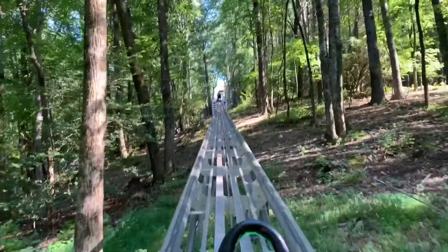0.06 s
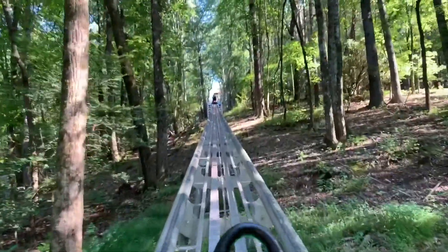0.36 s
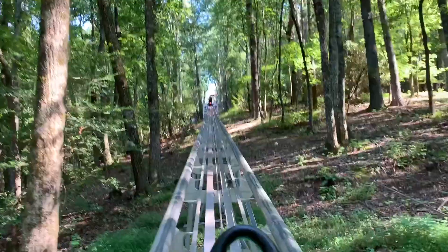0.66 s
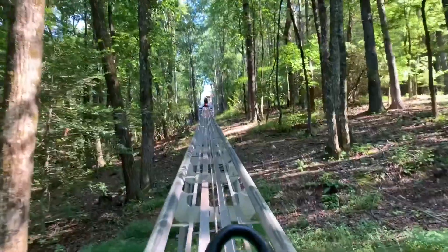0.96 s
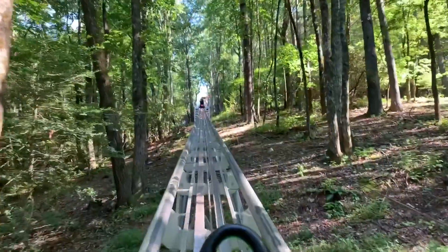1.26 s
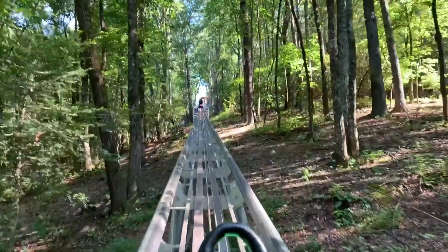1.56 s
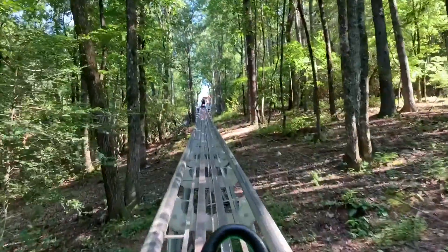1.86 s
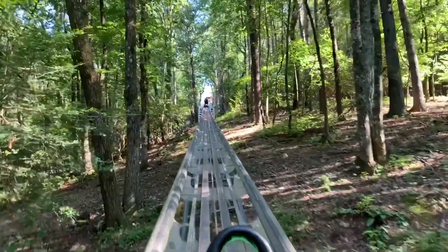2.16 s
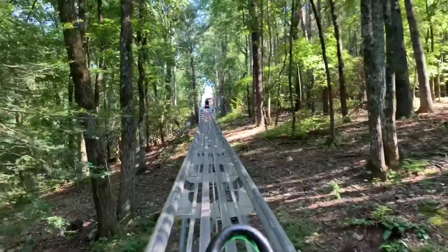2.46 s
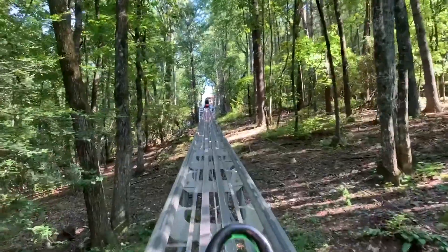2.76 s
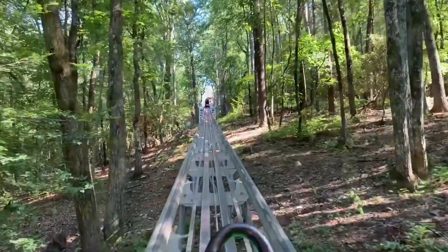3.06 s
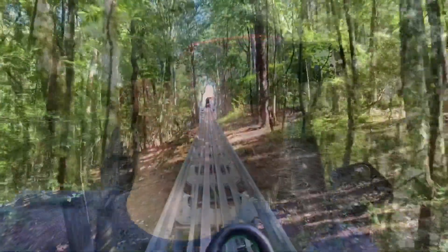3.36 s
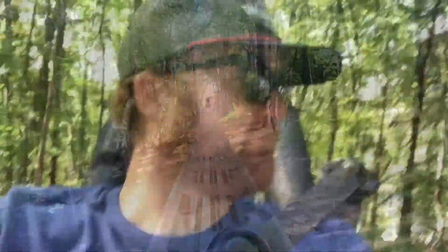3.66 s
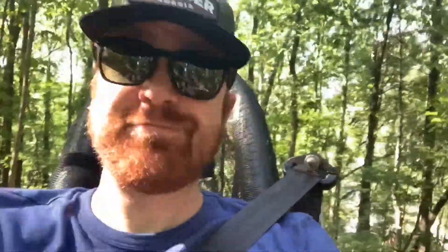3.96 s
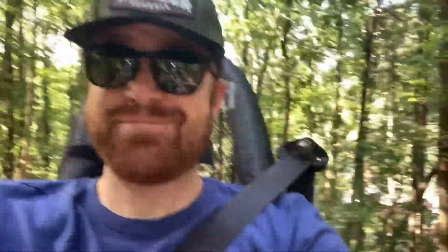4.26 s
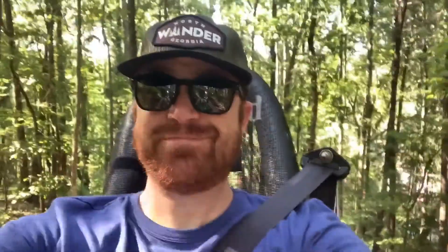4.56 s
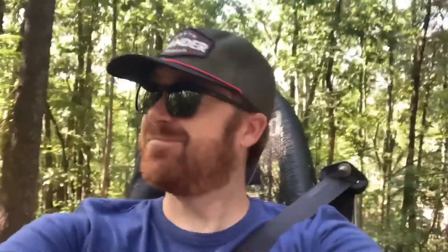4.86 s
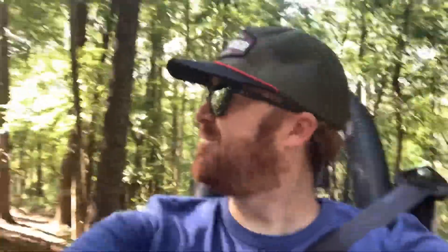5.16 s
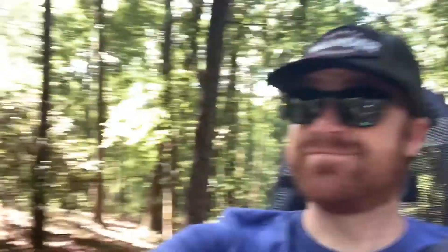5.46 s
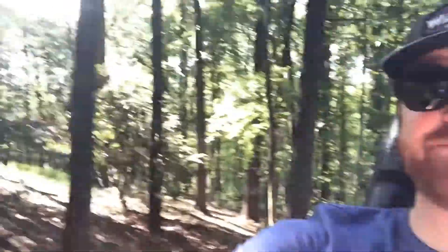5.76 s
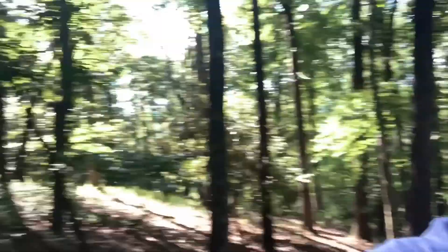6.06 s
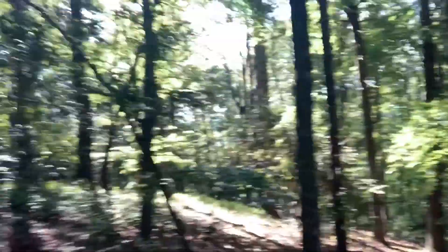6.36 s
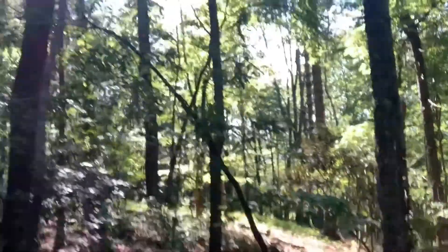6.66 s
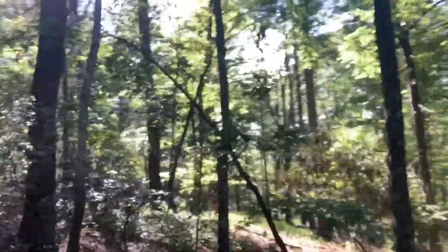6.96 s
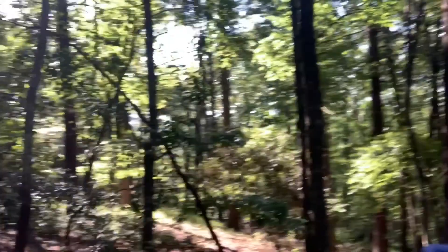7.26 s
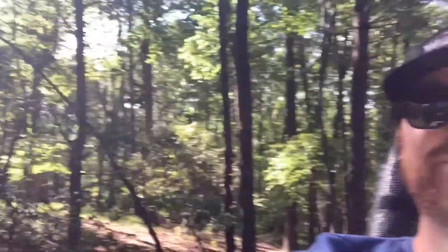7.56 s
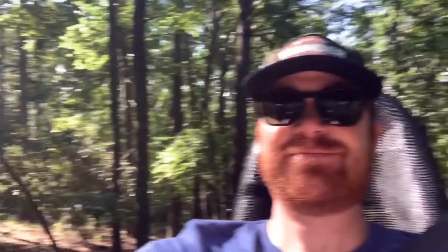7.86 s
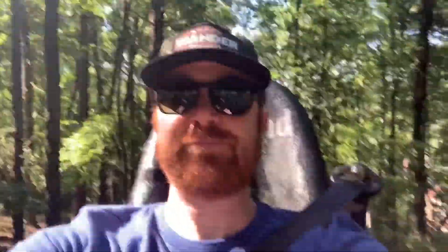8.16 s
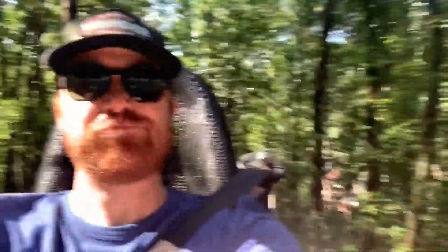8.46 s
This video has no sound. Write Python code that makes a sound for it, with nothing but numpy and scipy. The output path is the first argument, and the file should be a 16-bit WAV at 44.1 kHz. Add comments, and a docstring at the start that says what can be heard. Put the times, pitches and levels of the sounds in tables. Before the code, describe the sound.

A coaster cart rumbles along a steel track with sharp, ringing double clacks, dull bumps and gusts on the microphone.

```python
"""In the woods, on the seat of a coaster cart being hauled up a steel lift track.
The wheels rumble through the cart's frame and gusts buffet the microphone. Each axle crosses the track
joints with a double clack that rattles the cart and leaves the rails ringing. Loose fittings tick,
far blows thud along the rail, uneven spots make the seat boom, and steel squeals thinly on steel.
Later a faint high whine throbs and a thin sizzle comes in."""
import sys
import numpy as np
from scipy import signal
from scipy.fft import rfft, irfft, next_fast_len
from scipy.io import wavfile
from scipy.ndimage import map_coordinates

SR = 44100
rng = np.random.default_rng(int(sys.argv[2]) if len(sys.argv) > 2 else 0)


def digitize_waveform(pressure):
    """Quantize a signal to 16-bit integers and store it at the path in sys.argv[1].

    Rows of a 2-D input are taken as channels; values are limited to [-1, 1].
    """
    field = np.atleast_2d(pressure).T
    bounded = np.clip(field, -1, 1)
    quanta = np.round(bounded * 32767).astype(np.int16)
    wavfile.write(sys.argv[1], SR, quanta)


N = 375229
T = np.arange(N) / SR

# the tones that the rails ring with: (pitch [Hz], strength [dB])
RAIL_TONES = [(732, 4), (840, 6), (915, 3), (1044, 11), (1108, 7), (1225, 6), (1320, 5), (1429, 6),
              (1494, 4), (1575, 5), (1631, 6), (1688, 6), (1778, 8), (1908, 6), (2115, 7), (2275, 5),
              (2769, 3), (2938, 7), (3020, 6), (4080, 5), (4530, 5), (6260, 5)]
RAIL_SHARPNESS = 50  # a tone's pitch divided by its width
# One double clack a row; the wheel touches the joint, then lands: (landing time [s], touch earlier by [s],
# chatter length [s], knock [dB], frame [dB], main frame tone [Hz], second frame tone [Hz], clang [dB],
# treble [dB], zing [dB], rail ring [dB], its time to fade 60 dB [s], where steel rings most [Hz],
# clearest rail tone [Hz], frame at touch vs landing [dB], steel at touch vs landing [dB],
# left vs right [dB])
JOINT_CLACKS = [(0.0, .029, 0.038, -61, -32.5, 293, 610, -41, -51, -68, -26, 0.86, 1520, 1429, 0, 12.5, 0),
                (0.43, .021, 0.048, -21.5, -27, 285, 340, -33.5, -61, -88, -32.5, 1, 1170, 1050, -4.5, -4, 1),
                (3.131, .03, 0.041, -3, -20.5, 293, 524, -28, -46, -65, -28, 0.81, 1750, 1108, -5.5, -7, -1),
                (3.62, .023, 0.05, -47, -36.5, 295, 345, -50, -62.5, -77, -45.5, .6, 1550, 1044, -21, 6.5, -1.5),
                (4.945, 0.025, 0.048, -14, -24, 335, 198, -45, -59, -102, -39, 1.0, 1730, 1044, -2.5, 1, 1.5),
                (5.439, 0.031, 0.053, -14, -21.5, 290, 336, -34, -46.5, -64, -35.5, 0.87, 1780, 1044, -7, -3.5, 1.5),
                (6.524, .032, 0.041, -9, -17, 460, 1040, -34.5, -46.5, -71, -37.5, 0.57, 1060, 1320, -9, -18, 2.5),
                (7.011, 0.034, 0.049, -11.5, -18, 326, 325, -33, -46.5, -58.5, -36.5, 0.82, 820, 732, -8, -2, 1.5),
                (8.136, .017, 0.037, -36, -28.5, 290, 730, -36, -51.5, -74, -30, 0.8, 1630, 1631, 2.5, -4, 2)]


def amp(db):
    """Turns decibels into a number to multiply a sound by."""
    return 10 ** (np.asarray(db) / 20)


def level(curve):
    """Loudness over time, from rows of (time [s], level [dB])."""
    return amp(np.interp(T, *np.transpose(curve)))


def swell(start, length, rise, fall):
    """Rises from 0 to 1, holds, and falls back; all times are in seconds."""
    return np.clip(np.minimum((T - start) / rise, (start + length - T) / fall), 0, 1)


def db_at(points, hz):
    """The level at any pitch, from rows of (pitch [Hz], level [dB])."""
    pitches, db = np.transpose(points)
    return np.interp(np.log(hz + 1), np.log(pitches), db)


def near(hz, centre_hz, reach=0.11):
    """1 at the centre pitch, falling to 0 on either side."""
    return np.exp(-(np.log(hz / centre_hz) / reach) ** 2)


def evened(x, size=None):
    """Scales each channel to an average strength (rms) of 1, judged on its first `size` samples."""
    return x / np.sqrt(np.mean(x[..., :size] ** 2, -1, keepdims=True) + 1e-20)


def wobble(rate, size):
    """A smooth random curve that takes `rate` new values a second."""
    knots = rng.standard_normal(4000)
    return evened(map_coordinates(knots, [np.arange(size) * rate / SR], order=2, mode="wrap"))


def noise(colour, size, peaks=()):
    """Stereo noise of a given colour, with ringing peaks of (pitch [Hz], width [Hz], boost [dB])."""
    # stereo spread, narrow in the bass and wide above: (pitch [Hz], side vs middle [dB])
    spread = [(60, -5.5), (180, -13), (380, -7), (700, -1.5), (1300, 0.5), (4400, -0.5), (8000, 5),
              (12000, -3)]
    padded = next_fast_len(size)
    hz = np.fft.rfftfreq(padded, 1 / SR)
    db = db_at(colour, hz) + sum(boost / (1 + (2 * (hz - f) / width) ** 2) for f, width, boost in peaks)
    spectrum = rfft(rng.standard_normal((2, padded))) * amp(db)
    mid, side = irfft(spectrum * [np.ones(len(hz)), amp(db_at(spread, hz))], padded)[:, :size]
    return np.array([mid + side, mid - side]) / mid.std()


def add(mix, s, sound):
    """Lays a sound into the mix, starting at `s` seconds."""
    at = round(s * SR)
    part, sound = mix[:, max(at, 0):], sound[:, max(-at, 0):]
    part[:, :sound.shape[1]] += sound[:, :part.shape[1]]


def rolling(rumble_db=4, lumps_db=2, grit_db=1, wander_db=4, shake_db=-18.5, shake_s=0.19, wheels=3):
    """Wheels on steel rumble in the hollow cart and hiss, each ringing the rails in its own way."""
    # loudness of the rumble and of the hiss: (time [s], level [dB])
    rumble_levels = [(0, -38.5), (1.2, -36.5), (1.5, -40), (2.5, -39), (4.1, -43), (5.7, -37), (6.3, -41),
                     (7.3, -35), (7.6, -42.5), (8.5, -37.5)]
    hiss_levels = [(0, -45.5), (1.2, -49), (2.9, -48.5), (3.6, -51.5), (5.3, -51.5), (6.2, -53.5),
                   (7.6, -52), (8.5, -52.5)]
    # their colours: (pitch [Hz], level [dB])
    rumble_colour = [(20, -36.5), (30, -20), (42, -20), (58, 2), (80, -8), (105, -7.5), (135, 0),
                     (175, -3.5), (215, -7), (310, -13.5), (400, -19), (700, -27.5), (2000, -88.5)]
    hiss_colour = [(150, 5), (400, 5.5), (700, 2.5), (1100, 1), (1500, -7), (2100, -9.5), (2800, -18.5),
                   (4200, -21), (5700, -31.5), (6700, -26.5), (7900, -23), (8700, -52.5), (11000, -34.5),
                   (15500, -56.5)]
    # the hollow tones of the cart: (pitch [Hz], width [Hz], boost [dB])
    hollow = [(152.6, 10.7, 11), (312, 36, 7), (567, 2.9, 10.5)]
    # each landing shakes the cart and swells the rumble for a moment
    shake = sum(amp(frame_db + shake_db) * (T > s) * np.exp(-abs(T - s) / shake_s)
                for s, _, _, _, frame_db, *_ in JOINT_CLACKS)
    lumps = amp(rumble_db + lumps_db * wobble(22, N))
    rumble = lumps * np.hypot(level(rumble_levels), shake) * noise(rumble_colour, N, hollow)
    loads = np.array([amp(wander_db * wobble(5, N)) for _ in range(wheels)])
    hiss = np.zeros((2, N))
    for load in loads / np.linalg.norm(loads, axis=0):
        peaks = [(hz, 2 * hz / RAIL_SHARPNESS, db * 0.23 * rng.normal(0.25, 1)) for hz, db in RAIL_TONES]
        hiss += load * noise(hiss_colour, N, hollow + peaks)
    return rumble + amp(grit_db * wobble(60, N)) * level(hiss_levels) * hiss


def clacks(touch_s=0.03, touch_hz=365, touch_zing_db=-13.5, ring_rise_s=0.0067, shake_db=2, lag_ms=0.15):
    """At each joint the wheel touches, then lands, and leaves a long shaky ring in the rails."""
    out, t = np.zeros((2, N)), np.arange(SR) / SR
    hardness = 2.2  # a softer blow loses its knock and zing faster than its ring (dB per dB)
    for (s, lead_s, length, knock_db, frame_db, main_hz, second_hz, clang_db, treble_db, zing_db,
         ring_db, fade_s, ring_hz, clear_hz, touch_db, touch_steel_db, pan_db) in JOINT_CLACKS:
        touch = blow(knock_db + hardness * touch_db, frame_db + touch_db, touch_hz, main_hz, ring_hz,
                     clang_db + touch_steel_db, treble_db + touch_steel_db,
                     zing_db + touch_zing_db + hardness * touch_steel_db, touch_s)
        landing = blow(knock_db, frame_db, main_hz, second_hz, ring_hz,
                       clang_db, treble_db, zing_db, length)
        ring_gain = amp(ring_db + shake_db * wobble(40.6, SR)) * (1 - np.exp(-t / ring_rise_s))
        ring = ring_gain * rail_ring(t, fade_s, ring_hz, clear_hz)
        for at, sound in (s - lead_s, touch), (s, landing), (s, ring):
            add(out[:1], at, amp(pan_db / 2) * sound[:1])
            add(out[1:], at + lag_ms / 1000, amp(-pan_db / 2) * sound[1:])  # right ear, a little later
    return out


def blow(knock_db, frame_db, main_hz, second_hz, ring_hz, clang_db, treble_db, zing_db, length,
         knock_hz=440, knock_s=0.001224, rise_s=0.0056, grain_db=2, ring_db=6):
    """A wheel strikes the joint: a hard knock, the frame's ring, and a brief buzz of loose steel."""
    # colours of the steel's clang, treble and very high zing: (pitch [Hz], level [dB])
    clang_colour = [(150, -20), (400, 7.5), (700, 4), (1080, 2), (1600, -4.5), (2200, -10), (3000, -43.5),
                    (6000, -88), (10000, -76)]
    treble_colour = [(1200, -31), (2500, 4.5), (3400, 0.5), (4700, -2), (6500, -10), (8000, -12.5),
                     (8900, -54), (15000, -43.5)]
    zing_colour = [(6000, -50), (9300, -17.5), (10800, 7), (11700, 13.5), (12600, -7), (14000, -7),
                   (15500, -11.5)]
    # the thin ring in the zing: (pitch [Hz], width [Hz], boost [dB])
    zing_ring = [(12000, 70, 3.5)]
    n = SR // 3
    t = np.arange(n) / SR
    from_knock = t - np.e * knock_s
    knock = np.exp(-(from_knock / knock_s) ** 2) * np.sin(-2 * np.pi * knock_hz * from_knock)
    frame = amp(knock_db) * knock + amp(frame_db) * frame_ring(t, length, main_hz, second_hz)
    burst = (1 - np.exp(-t / rise_s)) * np.exp(-(t / (length * 1.04)) ** 1.32)
    rattle = burst * amp(grain_db * wobble(260, n))
    # every blow favours other rail tones
    struck = [(hz, hz / RAIL_SHARPNESS, db * rng.uniform(0.22, 1.6)) for hz, db in RAIL_TONES]
    clang = amp(clang_db) * noise(clang_colour, n, struck + [(ring_hz, ring_hz / 5, ring_db)])
    treble = amp(treble_db) * noise(treble_colour, n, struck)
    zing = amp(zing_db) * noise(zing_colour, n, zing_ring)
    return frame + evened(rattle, size=1300) * (clang + treble + zing)


def frame_ring(t, length, main_hz, second_hz, main_db=6, second_db=4, random_db=2.5, side_db=-6):
    """The wheel chatters briefly; each contact rings the cart's frame, boosted near two pitches."""
    # the frame's own tones: (pitch [Hz], level [dB], time to fade 60 dB [s])
    frame_tones = [(137, -0.5, 0.33), (196.5, -10.5, 0.4), (288.1, -1, 0.28), (326.5, -4, 0.054),
                   (352.7, -2, 0.13), (418, -3, 0.17), (455.4, -3.5, 0.14), (505, -3.5, 0.11),
                   (550, -29, .09), (602, -16.5, 0.24), (720, -11.5, 0.12), (764, -12.5, 0.1),
                   (1037, -15, 0.12)]
    hz, db, fade_s = np.transpose(frame_tones)[:, :, None]
    contacts = rng.standard_normal((2, 1, len(t))) * np.exp(-(t / length) ** 2)
    tones = amp(-60 * t / fade_s) * np.sin(2 * np.pi * hz * t)
    rings = signal.fftconvolve(contacts, tones[None], axes=2)[..., :len(t)]
    db = db + main_db * near(hz, main_hz) + second_db * near(hz, second_hz)
    db += random_db * rng.standard_normal(hz.shape)
    mid, side = evened((amp(db) * evened(rings)).sum(1), size=1800)
    return np.array([mid + amp(side_db) * side, mid - amp(side_db) * side])


def rail_ring(t, fade_s, main_hz, clear_hz, tones_db=-2.5, wash_db=-6, boost_db=3, max_beat_hz=7):
    """Struck rails ring with pulsing tones, the high ones dying first, over a wash of weaker ones."""
    # colour of the ring: (pitch [Hz], level [dB])
    colour = [(200, -30), (500, 6), (1050, 3), (1900, -4.5), (2600, -9), (4500, -19.5), (7500, -32.5),
              (9000, -65), (15000, -52)]
    hz, db = np.transpose(RAIL_TONES)
    phases = rng.random((2, len(hz), 1))
    beat_speed, beat_phase = rng.random((2, len(hz), 1))
    db = db + db_at(colour, hz) + boost_db * (near(hz, main_hz) + near(hz, clear_hz, reach=0.012))
    gains = amp(db + 0.5 * rng.standard_normal(len(hz)))
    beating = 1 + 0.5 * np.cos(2 * np.pi * (max_beat_hz * beat_speed * t + beat_phase))
    dying = amp(-60 * t / fade_s * (hz[:, None] / main_hz) ** 0.18)
    waves = np.sin(2 * np.pi * (hz[:, None] * t + phases))
    tones = gains @ (beating * dying * waves) / np.linalg.norm(gains)
    wash = noise(colour, len(t), [(main_hz, main_hz / 4, boost_db)])
    return amp(tones_db) * tones + amp(wash_db - 60 * t / fade_s) * wash


def wind(breeze_db=-53.5, rise_s=0.063, fall_s=0.046, flutter_db=2):
    """Quick gusts flutter on the microphone over a light breeze."""
    # gusts of air: (start [s], length [s], level [dB])
    gusts = [(0.003, 0.88, -30), (3.136, 0.43, -32.5), (4.04, 0.54, -45.5), (5.763, 0.38, -28),
             (6.5, 0.286, -32.5), (6.928, 0.58, -33)]
    # the wind's deep colour: (pitch [Hz], level [dB])
    colour = [(18, -36), (30, -11.5), (45, -0.5), (75, 4), (130, -1), (220, -8.5), (400, -25),
              (1000, -51.5), (3000, -90.5)]
    force = amp(breeze_db) + sum(amp(db) * swell(s, length, rise_s, fall_s) for s, length, db in gusts)
    flutter = evened(amp(flutter_db * wobble(35, N)))
    return force * flutter * noise(colour, N)


def ticks(ring_cycles=150):
    """Small loose metal parts tap, each with a short bright ring."""
    # the taps: (time [s], level [dB], pitch [Hz])
    taps = [(.216, -43, 3470), (.218, -49, 4880), (.411, -34, 4580), (.421, -36, 4620), (0.431, -37, 4700),
            (.643, -36, 1980), (2.12, -55, 5560), (2.187, -54, 6100), (3.274, -37.5, 1874),
            (3.344, -41.5, 1836), (3.417, -47.5, 1830), (5.09, -41, 1840), (5.163, -43.5, 1880),
            (5.201, -52, 1970), (5.24, -46.5, 1900), (5.286, -52, 1830), (5.592, -48, 2010),
            (5.631, -50, 1830), (5.654, -45.5, 1900), (5.734, -51, 1900), (5.768, -53, 1940)]
    out = np.zeros((2, N))
    for s, db, hz in taps:
        add(out, s, amp(db) * ping(hz, ring_cycles / hz))
    return out


def ping(hz, fade_s, rise_s=0.0026, rasp_db=-3, rasp_fade_s=0.025, top_hz=6800):
    """One tap of a loose fitting: a few ringing tones and a short, wide rasp."""
    # the fitting's own tones: (pitch [times the tap's pitch], level [dB])
    fitting_tones = [(.93, 2), (1, 4), (1.081, 0.5), (1.6, -8), (2.12, -10)]
    t = np.arange(SR // 6) / SR
    ratio, db = np.transpose(fitting_tones)
    phases = rng.random((2, len(ratio), 1))
    ring = evened(amp(db) @ np.sin(2 * np.pi * (hz * ratio[:, None] * t + phases)))
    rasp_colour = [(hz / 4, -30), (hz * .75, -7), (hz, 0), (hz * 1.3, -8), (hz * 2.2, -12), (hz * 3, -35)]
    rasp = amp(rasp_db - 60 * t / rasp_fade_s) * noise(rasp_colour, len(t))
    tap = (1 - np.exp(-t / rise_s)) * (amp(-60 * t / fade_s) * ring + rasp)
    return signal.sosfilt(signal.butter(8, top_hz, fs=SR, output="sos"), tap)


def thuds(first_hz=850, last_hz=270, glide_s=0.00618, fade_s=0.17, rise_s=0.0058):
    """A bending wave runs along the rail; its treble arrives first, so the pitch falls."""
    # blows from farther along the rail: (time [s], peak level [dB])
    far_blows = [(0.407, -25), (3.595, -29), (3.615, -29)]
    out, t = np.zeros((2, N)), np.arange(SR // 10) / SR
    hz = last_hz + (first_hz - last_hz) * np.exp(-t / glide_s)
    wave = np.sin(2 * np.pi * np.cumsum(hz) / SR) * amp(-60 * t / fade_s) * (1 - np.exp(-t / rise_s))
    for s, db in far_blows:
        add(out, s, amp(db) * np.array([wave, wave]) / abs(wave).max())
    return out


def squeal(wander_hz=85, flicker_db=4):
    """A wheel's rim sings thinly: two close tones waver and flicker as it sticks and slips."""
    # the rim's tones: (pitch [Hz])
    pitches = [4450, 4500]
    # their loudness: (time [s], level [dB])
    levels = [(.48, -120), (.56, -74), (.76, -61), (1.03, -77), (1.12, -130)]
    out = np.zeros((2, N))
    for hz in pitches:
        cycles = np.cumsum(hz + wander_hz * wobble(400, N)) / SR
        out += amp(flicker_db * wobble(45, N)) * np.sin(2 * np.pi * (cycles + rng.random((2, 1))))
    return level(levels) * out


def bumps(boom_hz=135, fade_s=0.046, rise_s=0.0099):
    """Uneven spots in the rail make the seat shell boom."""
    # dull bumps of the wheels: (time [s], level [dB])
    jolts = [(0.499, -4.5), (0.914, -2), (1.823, -9), (2.488, -5), (2.947, -6), (4.6, -10.5), (4.961, 0),
             (5.965, -7), (6.549, 2.5), (6.943, -5), (8.135, -3.5)]
    out, t = np.zeros((2, N)), np.arange(SR // 4) / SR
    boom = np.sin(2 * np.pi * boom_hz * t) * amp(-60 * t / fade_s) * (1 - np.exp(-t / rise_s))
    for s, db in jolts:
        add(out, s, amp(db) * np.array([boom, boom]))
    return out


def scrapes(ring_db=16, uneven_db=2):
    """Thin, rough squeals of steel on steel swell and fade."""
    # wheels rubbing the rail: (start [s], length [s], level [dB], pitch [Hz], width [Hz])
    rubs = [(0.614, 0.31, -65, 2850, 500), (.9, 2.6, -62.5, 1417, 131), (2.644, 0.26, -75, 4150, 150),
            (3.151, .36, -62, 3010, 260), (3.572, 0.12, -59, 2960, 200), (3.587, .045, -58, 4060, 151),
            (5.597, 1, -81, 4180, 100.4), (7.057, 0.89, -82, 4120, 108), (8.186, .36, -77, 4420, 251)]
    out = np.zeros((2, N))
    for s, length, db, hz, width in rubs:
        n = int(length * SR)
        rub = noise([(hz / 2, -40), (hz, 0), (hz * 2, -45)], n, [(hz, width, ring_db)])
        add(out, s, amp(db + uneven_db * wobble(30, n)) * signal.windows.hann(n) * rub)
    return out


def whine(hz=7800, throbs_per_s=22, depth_db=5, uneven_db=2):
    """A faint high whine, a narrow band of noise, throbs unevenly."""
    # loudness of the whine: (time [s], level [dB])
    levels = [(2.4, -102), (3, -82), (5.4, -75), (7, -76.5), (8.1, -71), (8.5, -75)]
    pulse = np.sin(2 * np.pi * throbs_per_s * T + 0.78 * wobble(3.6, N))
    throb = evened(amp(depth_db * pulse + uneven_db * wobble(5.3, N)))
    tone = noise([(hz / 2, -50), (hz, 0), (hz * 1.17, -45)], N, [(hz, 350, 14)])
    return level(levels) * throb * tone


def sizzle(rise_s=0.11, fall_s=0.1, sag_db_per_s=23):
    """A thin, high sizzle comes in softly; now and then it flares up and sags away."""
    # loudness of its steady part: (time [s], level [dB])
    levels = [(3, -98), (4, -86.5)]
    # its flares: (start [s], length [s], level [dB])
    flares = [(4.016, 0.64, -61), (8.218, .5, -64.5)]
    # its colour: (pitch [Hz], level [dB])
    colour = [(1500, -23.5), (3500, 7.5), (7500, 6), (9200, -35), (10700, -0.5), (15500, 5.5)]
    flaring = sum(amp(db - sag_db_per_s * abs(T - s - rise_s)) * swell(s, length, rise_s, fall_s)
                  for s, length, db in flares)
    return (level(levels) + flaring) * noise(colour, N)


def scene():
    """Everything heard from the seat."""
    return (rolling() + wind() + clacks() + thuds() + bumps()
            + ticks() + scrapes() + squeal() + whine() + sizzle())


def record(dry, low_cut_hz=32, high_cut_hz=15800):
    """Trims away the deepest bass and the highest treble."""
    trimmed = signal.sosfilt(signal.butter(4, low_cut_hz, "high", fs=SR, output="sos"), dry)
    high_cut = signal.firwin(511, high_cut_hz, window=("kaiser", 9), fs=SR)
    return signal.oaconvolve(trimmed, high_cut[None], "same")


dry = scene()
out = record(dry)
digitize_waveform(out)
```